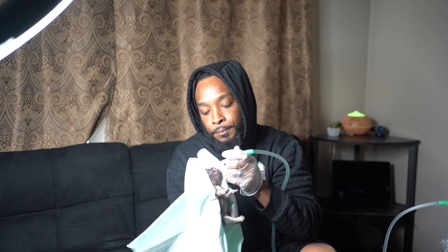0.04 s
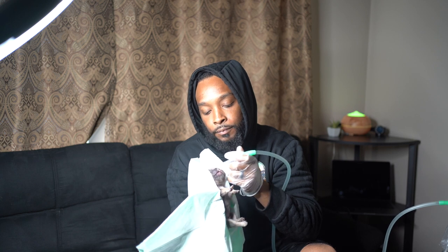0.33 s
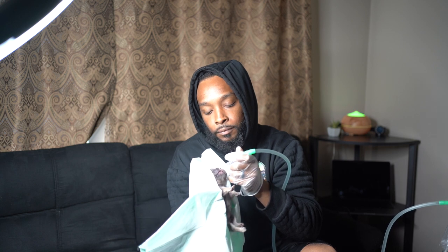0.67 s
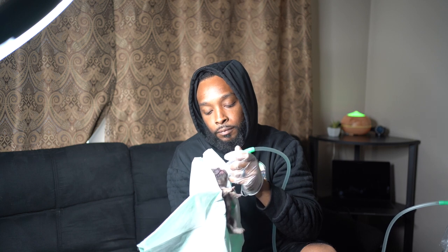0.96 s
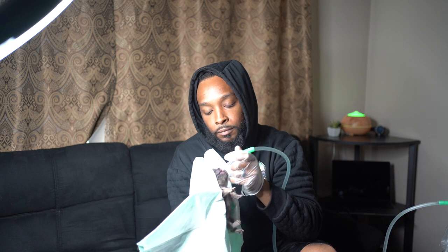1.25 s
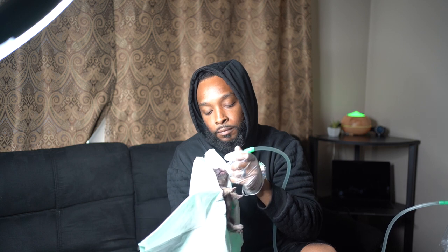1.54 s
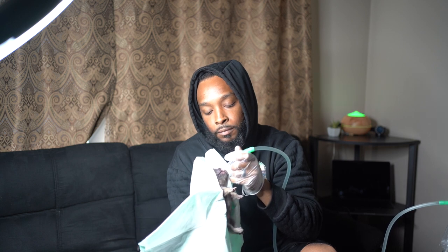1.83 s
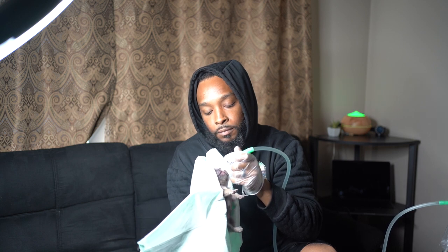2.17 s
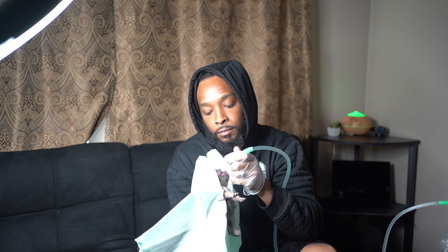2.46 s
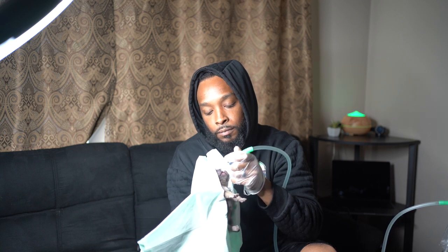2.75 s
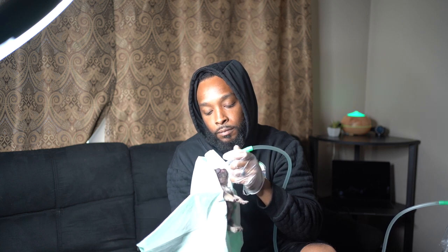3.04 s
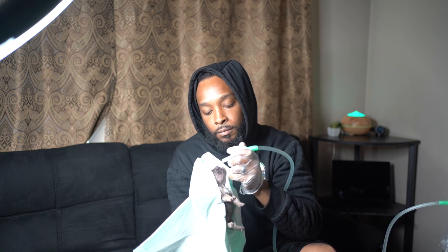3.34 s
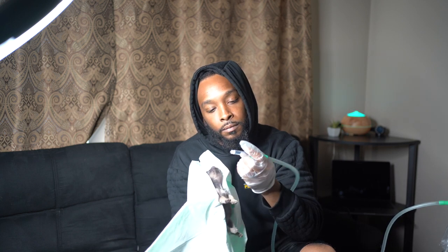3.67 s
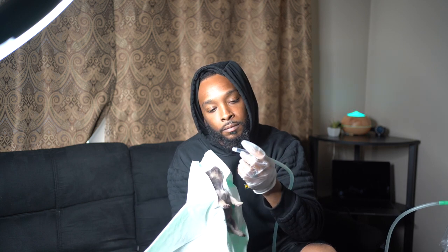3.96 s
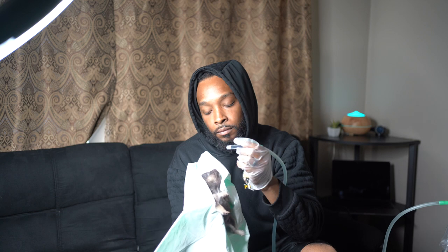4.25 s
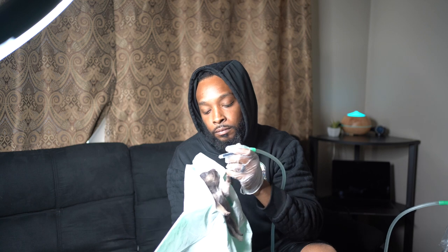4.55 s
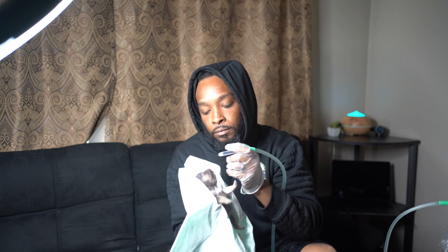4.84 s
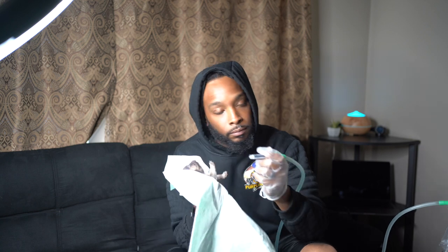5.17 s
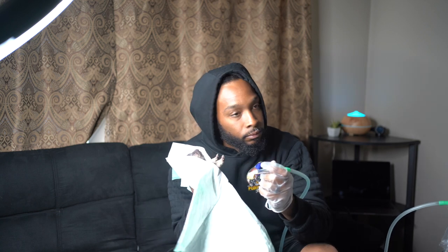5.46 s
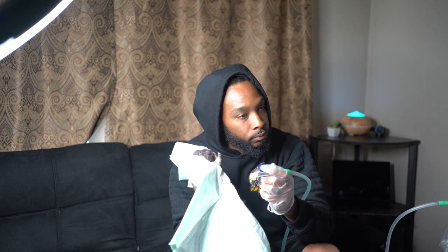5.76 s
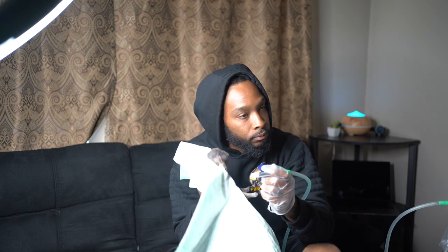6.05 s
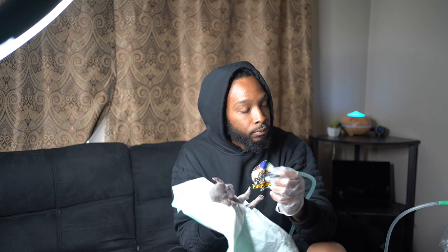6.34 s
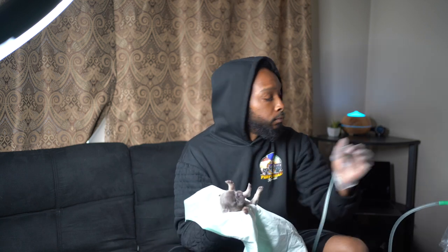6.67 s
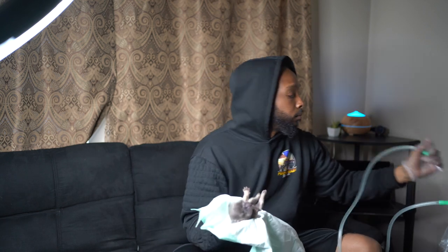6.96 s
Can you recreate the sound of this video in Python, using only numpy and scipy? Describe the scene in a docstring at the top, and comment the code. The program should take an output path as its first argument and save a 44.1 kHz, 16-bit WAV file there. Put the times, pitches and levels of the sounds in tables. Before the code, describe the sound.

A small electric suction pump runs steadily for the whole seven seconds in a furnished room with little echo. Its motor gives a constant, buzzy hum over a low murmur, while the valves tick about 28 times a second, blending into a light rattle. Air hisses in and out with a fast flutter, edged by high, breathy whistles that surge irregularly. From about 1.3 to 3.5 seconds the nozzle draws harder: the hum changes colour and a thin, very high hiss comes in, strongest around 2.4 seconds. The rattle briefly hardens near 4.8 seconds. Faint, fuzzy squeaks and short ringing tones, some sliding slightly in pitch, appear at about 2.7, 3.0, 3.7 and 4.2 seconds, with three more between 6.3 and 6.8 seconds. The pump keeps the same speed to the end.

```python
"""In a furnished room, a small electric suction pump runs steadily, drawing air through a thin tube.
Its crank turns about 28 times a second: the case hums on multiples of that rate, the valves tick on
every turn, and air hisses in and out in two alternating strokes, edged with breathy whistles.
As the nozzle draws, the hum changes colour and a thin, high hiss comes in. Faint squeaks and brief
ringing tones come and go over a low murmur of motor and room."""
import sys
import numpy as np
from scipy import signal
from scipy.fft import rfft, irfft
from scipy.io import wavfile

SR = 44100
rng = np.random.default_rng(int(sys.argv[2]) if len(sys.argv) > 2 else 0)


def inscribe(sig):
    """Save sig as 16-bit PCM at rate SR to the path in sys.argv[1].

    A 1-D sig is mono; a 2-D sig holds one channel per row.
    Samples are clipped to [-1, 1] before scaling.
    """
    pcm = np.round(np.clip(np.atleast_2d(sig).T, -1, 1) * 32767)
    wavfile.write(sys.argv[1], SR, pcm.astype(np.int16))


N = 308815
TIME = np.arange(N) / SR
HZ = np.fft.rfftfreq(N, 1 / SR)
CRANK_HZ = 27.806

# Valve snaps within one turn: position_turns, level_db
VALVE_TICKS = [(.31, 0), (.58, 1.5), (.87, -2)]
# How the room leans each band to one side: frequency_hz, left_minus_right_db
STEREO_TILT = [(60, 0.0), (120, -7), (240, 10), (480, 2.5), (950, -3), (1890, -2.5), (3770, -1), (7520, -1),
               (15000, -3)]


def air_strokes(turns, load, intake_at_turns=0.33, depth=0.81, flutter_db=0.79):
    """Intake and exhaust hiss half a turn apart; both swell and flutter, and load starves the exhaust."""
    # Colour of the air drawn in: frequency_hz, level_db
    intake = [(250, -80), (500, -68.5), (1100, -68.5), (1600, -61), (1950, -60), (2500, -61.5),
              (3300, -60.5), (4200, -63), (5800, -58), (7500, -58.5), (8600, -54.5), (9400, -57),
              (11000, -55), (12500, -56.5), (15700, -63)]
    # Colour of the air pushed out: frequency_hz, level_db
    exhaust = [(250, -89), (500, -71.5), (1100, -62), (1600, -63.5), (1950, -61), (2500, -59.5),
               (3700, -63.5), (4300, -60.5), (6200, -57), (7500, -59.5), (8700, -57), (10800, -60),
               (12500, -61), (15700, -60)]
    swing = depth * np.cos(2 * np.pi * (turns - intake_at_turns))
    in_db = -1.5 + 0.22 * swell() + flutter_db * drift(18)
    out_db = -0.65 * load + 0.3 * swell() + flutter_db * drift(24)
    return jet(intake, in_db) * np.sqrt((1 + swing) / 2) + jet(exhaust, out_db) * np.sqrt((1 - swing) / 2)


def jet(spectrum, flow_db):
    """Turbulent air at one opening: near surfaces comb it, and the far room adds a diffuse wash."""
    # Resonances of the air path and case: centre_hz, width_hz, lift_db
    air_peaks = [(622, 23, 8), (1127, 42, -5.5), (1293, 52, 5), (1550, 79, -2.5), (1864, 190, 3),
                 (3070, 210, 3), (5850, 100, 3)]
    lift_db = sum(db / (1 + (2 * (HZ - hz) / width) ** 2) for hz, width, db in air_peaks)
    colour = amp(over_frequency(spectrum) + lift_db) * HZ ** 2 / (HZ ** 2 + 150 ** 2)  # thin in the bass
    diffuse = 0.16 + 0.67 / (1 + (HZ / 1100) ** 4)  # lows spread all round
    near = noise() * room(t60_s=0.33, wet=0.81)
    far = np.array([noise(), noise()]) * ear_gains()
    return irfft((np.sqrt(1 - diffuse) * near + np.sqrt(diffuse) * far) * colour, N) * amp(flow_db)


def eddies(air, patch_db=1.74, width_hz=180, rate_hz=4.6, above_hz=2000):
    """The flow never settles: narrow patches of the treble brighten and fade, each on its own."""
    hz, s, spectrogram = signal.stft(air, SR, nperseg=1024)
    across = np.fft.fftfreq(len(hz), hz[1])[:, None] * 2 * width_hz
    along = np.fft.fftfreq(len(s), s[1]) / rate_hz
    speckle = np.fft.fft2(rng.standard_normal(spectrogram.shape))
    patches = unit_rms(np.fft.ifft2(speckle * np.exp(-across ** 2 - along ** 2)).real)
    depth_db = patch_db * (hz ** 2 / (hz ** 2 + above_hz ** 2))[:, None]
    return signal.istft(spectrogram * amp(depth_db * patches), SR, nperseg=1024)[1][:, :N]


def case_hum(turns, load, rocking_below=19, valves_above=45):
    """Blows shake the case on multiples of the crank rate: the piston below, the valves higher up."""
    # Hum partials, with halves as every second turn differs: crank_multiple, left_db, right_db, load_db
    partials = [(1, -37.5, -37.5, 1.5), (2, -49, -49, 1), (5, -47.5, -47.5, 0), (5.5, -59.5, -59.5, 2),
                (6, -56.5, -57, 2), (7, -55.5, -55.5, -0.5), (9, -63.5, -64, 2), (9.5, -62, -60, -1),
                (10, -61, -61, -2), (11, -51, -49, 0.5), (12, -62, -54, -2), (12.5, -60, -59, -5),
                (13, -45, -46.5, -5.5), (14, -56, -54.5, 0), (15, -56, -53.5, 6.5), (16, -57.5, -49, 0),
                (17, -58, -50, -2.5), (18, -53, -54.5, 0.5), (19, -59, -54, -3), (20, -47, -49.5, -3.5),
                (21, -58, -51, 1), (22, -35.5, -40.3, -5.3), (23, -56, -56, 0), (24, -57, -57, 1),
                (25, -55, -54, -3), (26, -54, -46.5, 0), (28, -50.5, -46, 2.5), (29, -51, -55, 2),
                (30, -55, -48.5, 0), (31, -54, -54, 1), (33, -55, -54, -1), (34, -54, -55, -3),
                (35, -55, -56, -2), (38, -56, -51.5, 8), (54, -57, -49, 2), (63, -46, -47, -7),
                (65, -54, -45, -7), (66, -51, -41.5, -7), (67, -45, -54, -7), (69, -43.5, -52, -7),
                (70, -50, -44, -7), (77, -50, -43.5, -5), (79, -48, -55, -3), (81, -48.5, -55, -3)]
    # The piston knocks the case as it turns round: position_turns, level_db
    piston_knocks = [(.19, -2), (.74, 0)]
    out = np.zeros((2, N))
    roughness = 0.16 * drift(24)
    for order, left_db, right_db, load_db in partials:
        blows = VALVE_TICKS if order > valves_above else piston_knocks
        drive = sum(amp(db) * np.exp(-2j * np.pi * order * position) for position, db in blows)
        waver = (0.06 + 0.27 * (order / 70) ** 2) * drift(4.1)
        unsteady = 1 + waver + roughness * min(order / 20, 1)
        gain = amp([[left_db], [right_db]]) * amp(load_db * load) * unsteady
        ear_phase = 0.27 * (order / 20) ** 1.93 * np.array([[-.5], [.5]])
        # The lowest partials come from the whole case rocking and keep no step with the blows.
        phase = np.angle(drive) + 0.5 * (1 + (rocking_below / order) ** 4) * rng.standard_normal()
        out += gain * np.sqrt(2) * np.cos(2 * np.pi * order * turns + phase + ear_phase)
    return out


def valves(turns, scatter_db=1.5, jitter_s=.00005):
    """Valve flaps snap at set points of each turn and ring the pump head, now harder, now softer."""
    # Ring of the pump head: pitch_hz, width_hz, level_db
    head_modes = [(1310, 83, -7.5), (1525, 48, -11), (1850, 180, 1), (1970, 127, 4), (2260, 90, -10),
                  (2760, 110, -16), (3160, 130, -1), (4700, 240, -17)]
    # How hard the valves rattle: time_s, level_db
    rattle = [(0, -48), (.3, -33), (1.2, -37.5), (1.6, -44), (3.1, -38), (3.6, -38), (4.3, -35.5),
              (4.75, -33), (4.85, -28), (4.97, -34.5), (5.5, -35), (7, -35)]
    clicks, whole_turns = np.zeros(N), np.arange(int(turns[-1]))
    for position, db in VALVE_TICKS:
        late, force = rng.standard_normal((2, len(whole_turns)))
        at_s = np.interp(whole_turns + position, turns, TIME) + jitter_s * late
        clicks[np.clip(np.round(at_s * SR).astype(int), 0, N - 1)] += amp(db + scatter_db * force)
    head = sum(amp(db) / (1 + 2j * (HZ - hz) / width) * (-1) ** k
               for k, (hz, width, db) in enumerate(head_modes))
    ring = irfft(rfft(clicks) * head * HZ / (HZ + 500) * room(t60_s=0.12, wet=0.27), N)
    return unit_rms(ring) * amp(over_time(rattle))


def whistles(turns, flicker_db=-0.3, bend_hz=38, surge_s=0.075):
    """Air-path resonances, each blown for part of every turn; the swelling flow bends their pitch."""
    # Whistles: pitch_hz, width_hz, level_db, peak_turns, length_turns, surge_db, left_minus_right_db
    voices = [(3620, 110, -38.5, 0.98, 0.85, 9.5, 1), (4450, 600, -46, 0.41, 0.2, 9, -1),
              (6430, 790, -37.5, 0.86, 0.17, 5, 0), (9310, 170, -33.5, 0.33, 0.34, 2, -14),
              (9540, 180, -36, 0.66, 0.3, 0.5, 10), (10030, 110, -37, 0.22, 0.49, 1, -12),
              (10600, 300, -43.5, 0.19, 0.31, -2, -10)]
    # Moments when the whistling catches and surges: time_s, strength
    surges = [(.22, .6), (.5, 0.7), (.82, .8), (1.68, 0.2), (2.11, 1), (2.52, 0.7), (2.78, .65), (3.02, .6),
              (3.42, .65), (3.85, 0.6), (4.0, 1), (4.2, 0.7), (4.56, .8), (4.8, .6), (5.2, .5), (5.46, 1),
              (6.1, 0.3), (6.5, .5)]
    out = np.zeros((2, N))
    surge = sum(strength * np.exp(-((TIME - s) / surge_s) ** 2) for s, strength in surges)
    for hz, width, db, peak, length, surge_db, side_db in voices:
        tone = np.fft.ifft(noise() * room(t60_s=0.22, wet=0.4) / (1 + ((HZ - hz) / width * 2) ** 2), N)
        flow = swell()
        bent = (tone * np.exp(2j * np.pi * np.cumsum(bend_hz * flow) / SR)).real
        puffs = np.exp(-2 * (np.sin(np.pi * (turns - peak)) / (np.pi * length)) ** 2)
        panned = unit_rms(bent * puffs * amp([[side_db], [0]]))
        out += amp(db + flicker_db * flow + surge_db * surge) * panned
    return out


def nozzle(load, centre_hz=13400, width_hz=2600, full_load_db=-35):
    """Thin, high hiss of air squeezing past the tip while it draws."""
    band = np.exp(-((HZ - centre_hz) / width_hz * 2) ** 2)
    hiss = irfft(noise() * room(t60_s=0.2, wet=0.98) * band, N)
    return amp(full_load_db) * np.maximum(load, 0) * unit_rms(hiss)


def squeaks():
    """Faint, fuzzy squeaks and brief ringing tones, some sliding, each rising and fading in one arch."""
    # Squeaks and ringing tones: start_s, length_s, first_hz, last_hz, fuzz_hz, level_db
    brief_tones = [(2.69, .15, 1300, 1325, 45, -39), (3.02, .14, 1500, 1505, 12, -41),
                   (3.71, .2, 1006, 930, 40, -45), (4.187, 0.25, 832, 1033, 6.8, -47),
                   (6.264, .3, 1290, 1067, 29, -42), (6.53, .11, 1210, 1230, 25, -43),
                   (6.68, 0.076, 1293, 1320, 150, -34)]
    out = np.zeros(N)
    for start, length, first_hz, last_hz, fuzz_hz, db in brief_tones:
        along = np.clip((TIME - start) / length, 0, 1)
        hz = first_hz + (last_hz - first_hz) * along + fuzz_hz * drift(2 * fuzz_hz)
        out += amp(db) * np.sin(np.pi * along) * np.sqrt(2) * np.cos(2 * np.pi * np.cumsum(hz) / SR)
    return out


def windings(waver=0.091):
    """The motor windings and frame drone at their own pitches, apart from the crank."""
    # Steady motor tones: pitch_hz, level_db
    tones = [(120.3, -48.5), (110.8, -59), (203.3, -58)]
    return sum(amp(db) * np.sqrt(2) * (1 + waver * drift(2))
               * np.sin(2 * np.pi * (hz * TIME + rng.random())) for hz, db in tones)


def rumble():
    """A bed of low noise from the motor and the room."""
    # Colour of the murmur: frequency_hz, density_db_per_hz
    murmur = [(8, -82), (25, -82), (42, -76), (58, -72), (78, -78), (125, -71.5), (170, -73.5), (230, -78),
              (400, -78.5), (1000, -110)]
    return irfft(noise() * amp(over_frequency(murmur)), N)


def room(t60_s, wet):
    """Stereo frequency response from one spot on the pump: a direct path, then dense reflections."""
    taps = rng.standard_normal((2, N)) * amp(-60 * TIME / t60_s) * (TIME > .001)
    taps *= np.sqrt(wet / np.sum(taps ** 2, 1, keepdims=True))
    taps[0, 5] = taps[1, 0] = np.sqrt(1 - wet)  # the right ear hears it first
    return rfft(taps) * ear_gains()


def ear_gains():
    """Left and right gain at each frequency."""
    tilt_db = over_frequency(STEREO_TILT)
    return amp([tilt_db / 2, -tilt_db / 2])


def swell():
    """Uneven rise and fall of the airflow, a few times a second."""
    return drift(1.4, centre_hz=3.23)


def drift(spread_hz, centre_hz=0, size=16384):
    """Smooth random motion of rms 1, its rates spread round centre_hz."""
    hz = np.fft.rfftfreq(size, TIME[-1] / size)
    band = np.exp(-((hz - centre_hz) / spread_hz) ** 2) * (hz > 0)
    slow = irfft(rfft(rng.standard_normal(size)) * band)
    return unit_rms(np.interp(TIME, np.linspace(0, TIME[-1], size), slow))


def noise():
    """Spectrum of white noise at 0 dB per Hz."""
    return rfft(rng.standard_normal(N)) * np.sqrt(SR / 2)


def over_frequency(points):
    """An EQ curve through (frequency_hz, value) points."""
    hz, value = np.transpose(points)
    return np.interp(np.log(HZ + 1), np.log(hz + 1), value)


def over_time(points):
    """An envelope through (time_s, value) points."""
    return np.interp(TIME, *np.transpose(points))


def amp(db):
    """Decibels to gain."""
    return 10 ** (np.asarray(db) / 20)


def unit_rms(x):
    """Scales to rms 1."""
    return x / np.sqrt(np.mean(x ** 2) + 1e-20)


def scene(wander_turns=0.0041):
    """The near-steady crank drives hum, valves and air; the load on the nozzle colours hum and air."""
    # Load on the pump, near 0 when free and 1 at full draw: time_s, load
    draw = [(0, 0.1), (.5, -.1), (1.15, 0), (1.8, 0.74), (2.4, 1), (3.05, 0.74), (3.5, 0.06), (4.1, 0),
            (4.9, 0.04), (6, 0.12), (7, 0.18)]
    load = over_time(draw)
    turns = CRANK_HZ * TIME + wander_turns * drift(0.69)
    machine = rumble() + case_hum(turns, load) + windings() + valves(turns)
    air = eddies(air_strokes(turns, load)) + whistles(turns) + nozzle(load)
    return machine + air + squeaks()


def record(dry, cutoff_hz=15740):
    """A steep low-pass takes off the very top of the hiss."""
    low_pass = signal.firwin(1023, cutoff_hz, window=("kaiser", 9), fs=SR)
    return signal.oaconvolve(dry, low_pass[None], "same")


dry = scene()
out = record(dry)
inscribe(out)
```